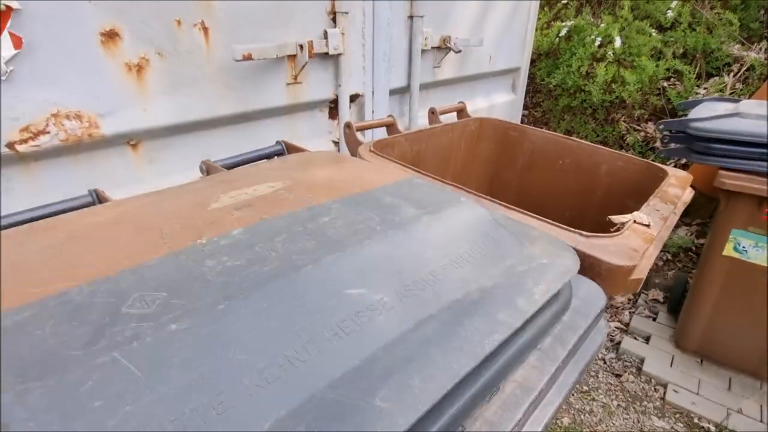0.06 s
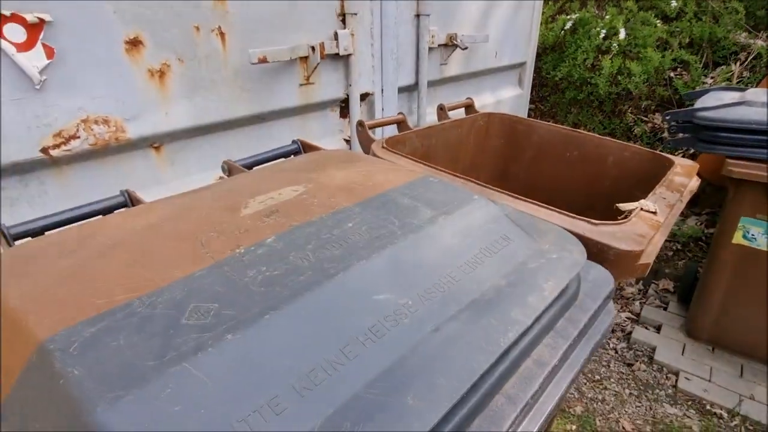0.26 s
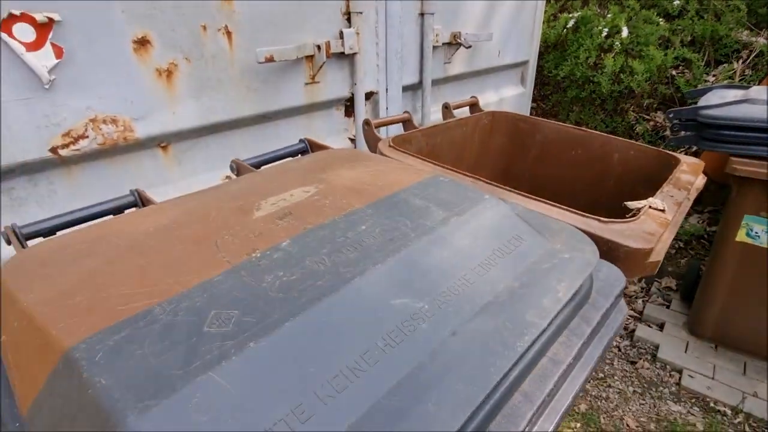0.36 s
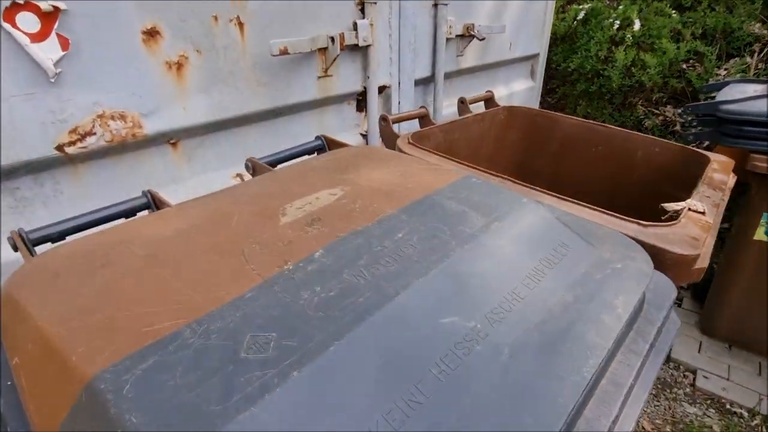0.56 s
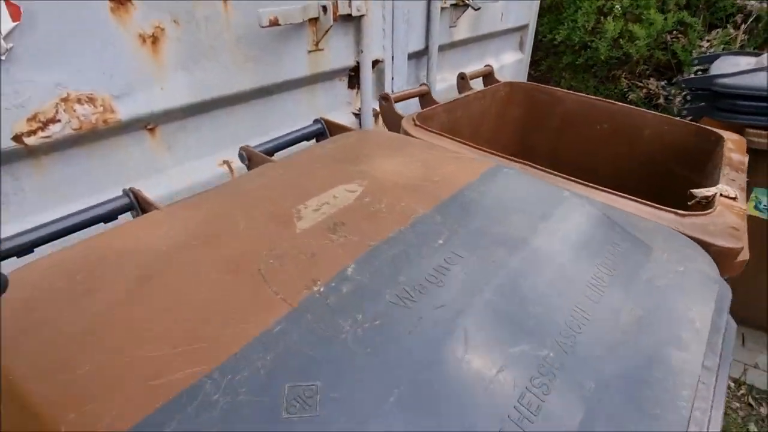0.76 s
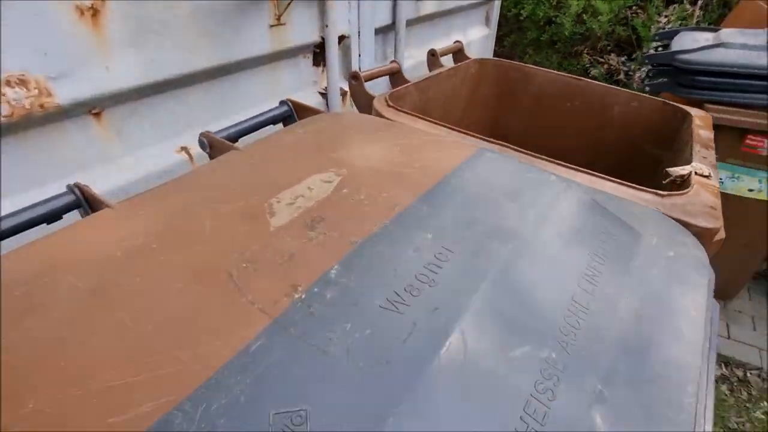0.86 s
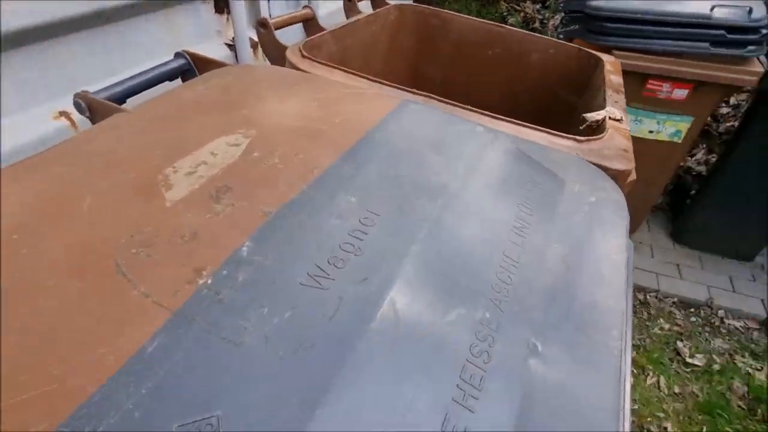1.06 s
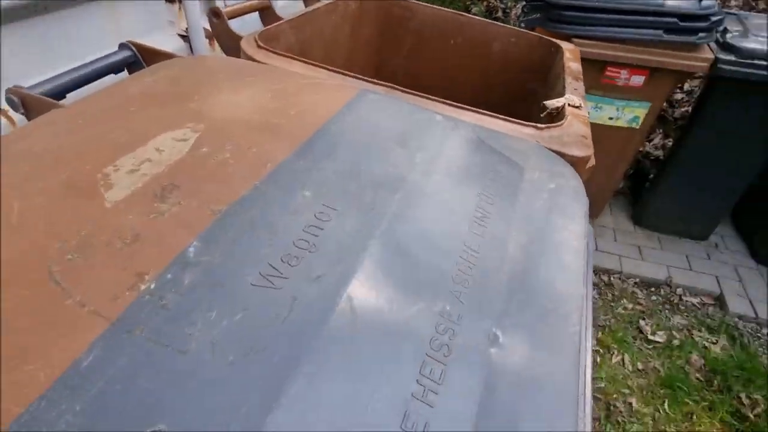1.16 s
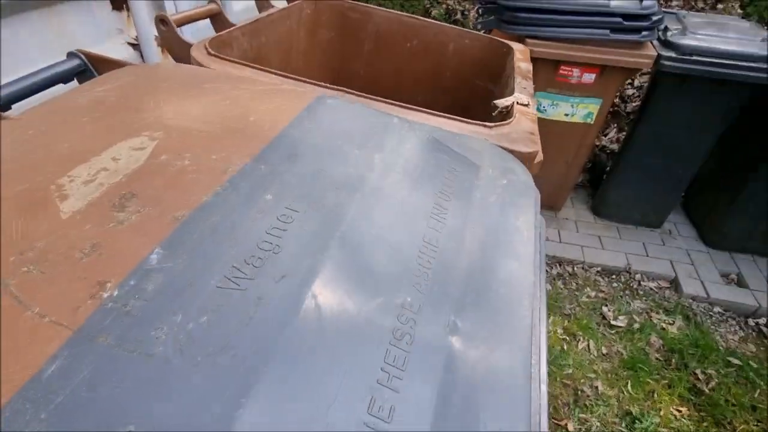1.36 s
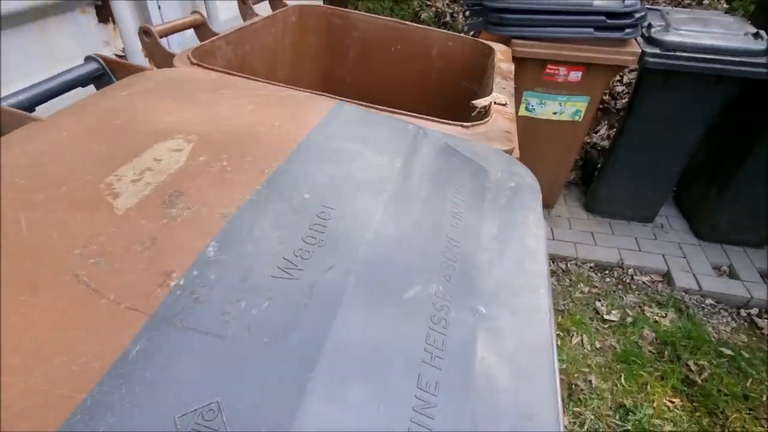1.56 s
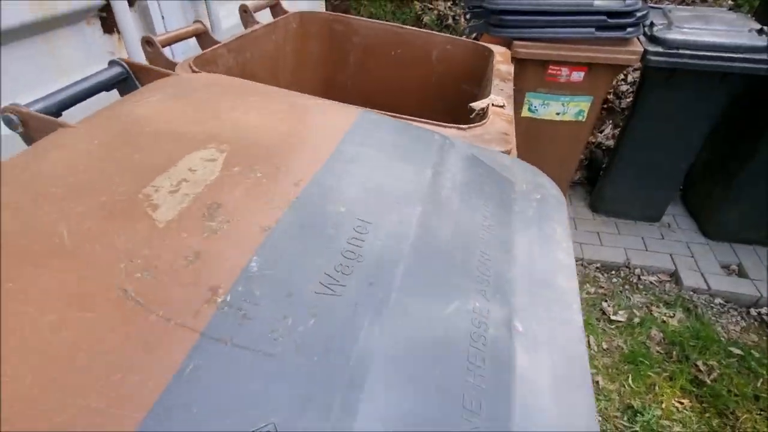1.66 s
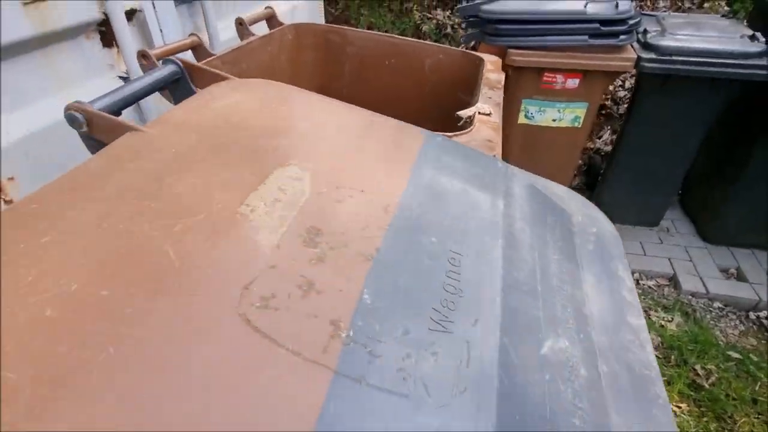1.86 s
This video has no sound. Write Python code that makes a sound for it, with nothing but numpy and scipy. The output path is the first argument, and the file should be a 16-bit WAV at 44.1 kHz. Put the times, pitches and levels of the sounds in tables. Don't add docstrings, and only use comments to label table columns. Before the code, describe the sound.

A large plastic bin lid drops shut close by at about 0.2 s: a sharp crack, a ringing shell and a hollow low boom, with rattling bounces near 0.3 and 0.5 s, fading by 0.7 s with a short yard echo. Quiet outdoor air and low rumble continue. Faint cloth rustles begin near 1 s, with distant bird whistles; soft scuffs and handling knocks follow around 1.5 to 1.7 s.

```python
import sys
import numpy as np
from scipy import signal
from scipy.fft import rfft, irfft, next_fast_len
from scipy.io import wavfile
from scipy.ndimage import uniform_filter1d

SR = 44100
rng = np.random.default_rng(int(sys.argv[2]) if len(sys.argv) > 2 else 0)


def natural_amplitude(level_db):
    exponent = np.asarray(level_db, float) / 20
    return 10 ** exponent


def store_pcm(level_fs):
    pcm = np.round(np.clip(level_fs, -1, 1) * 32767).astype(np.int16)
    wavfile.write(sys.argv[1], SR, np.atleast_2d(pcm).T)


N = 83790


def read(points, hz):
    f, value = np.transpose(points)
    return np.interp(np.log(hz + 1), np.log(f + 1), value)


def evened(x):
    return x / np.sqrt(np.mean(x ** 2) + 1e-30)


def add(mix, start_s, sound):
    part = mix[..., round(start_s * SR):][..., :sound.shape[-1]]
    part += sound[..., :part.shape[-1]]


def sided(left_right_db):
    return natural_amplitude([[left_right_db / 2], [-left_right_db / 2]])


def coloured(x, points, treble_db=0.):
    hz = np.fft.rfftfreq(1024, 1 / SR)
    tilt_db = treble_db * np.log2(np.maximum(hz / 3000, 1)) / 2
    gain = natural_amplitude(read(points, hz) + tilt_db) * (hz > points[0][0] / 2)
    taps = np.roll(irfft(gain), 512) * np.hanning(1024)
    return signal.oaconvolve(x, taps[None] / np.linalg.norm(taps), "same", axes=1)


def drifting_noise(points, db, size):
    # hz, correlation
    likeness = [(30, -0.54), (130, 0.78), (290, 0.6), (640, -0.034), (1400, 0.08), (3100, 0.043),
                (7000, 0.17)]
    patchy_db, swell_db = 1.2, .7
    frames, hz = 4 * N // size + 5, np.fft.rfftfreq(size, 1 / SR)
    a, b, c, d, patches = rng.standard_normal((frames, len(hz), 5)).T
    swell = evened(uniform_filter1d(patches[0], size=24))
    patches = uniform_filter1d(patches, size=12, axis=0)
    patches = evened(uniform_filter1d(patches, size=20, axis=1))
    same = np.clip(read(likeness, hz), -1, 1)[:, None]
    left = a + 1j * b
    right = same * left + np.sqrt(1 - same ** 2) * (c + 1j * d)
    gain_db = read(points, hz)[:, None] + patchy_db * patches + swell_db * swell
    z = np.array([left, right]) * natural_amplitude(gain_db)
    noise = signal.istft(z, nperseg=size, noverlap=size * 3 // 4)[1][:, :N]
    return natural_amplitude(db) * evened(noise)


def hiss():
    # hz, level_db
    hiss_spectrum = [(6000, -1.5), (9000, -6), (11300, -9), (12300, 2), (15700, -1)]
    return drifting_noise(hiss_spectrum, -78.5, size=512)


def rumble():
    # hz, level_db
    rumble_spectrum = [(12, -31), (24, -6.5), (59, 1.5), (177, -25), (311, -25), (344, -16), (400, -26.5),
                       (520, -51), (880, -120)]
    return drifting_noise(rumble_spectrum, -59.5, size=2048) * sided(4.5)


def outdoor_air():
    # hz, level_db
    air_spectrum = [(150, -5), (360, -9.5), (800, -9.5), (2000, -6.5), (4000, -8.5), (4600, -14),
                    (7400, -19), (8300, -33)]
    return drifting_noise(air_spectrum, -61.5, size=512) * sided(-1)


def birds():
    # start_s, length_s, from_hz, to_hz, level_db
    whistles = [
        (1.087, 0.091, 4070, 4050, -69),
        (1.212, 0.106, 3750, 3738, -72),
        (1.269, 0.03, 4900, 4760, -74),
        (1.361, .11, 4180, 4050, -72.5),
        (1.462, .09, 3250, 3490, -65),
        (1.526, 0.128, 3470, 3340, -68),
        (1.754, .13, 3100, 3300, -68),
    ]
    waver_hz, blur_share = 30, .3
    out, chance = np.zeros(N), rng.standard_normal((12, 2, SR // 4))
    for (start_s, length_s, from_hz, to_hz, db), (waver, blur) in zip(whistles, chance):
        u = np.arange(0, 1, 1 / (SR * length_s))
        waver = evened(uniform_filter1d(waver, size=300))[:len(u)]
        hz = from_hz + (to_hz - from_hz) * u + waver_hz * waver
        level = 1 + blur_share * evened(uniform_filter1d(blur, size=400))[:len(u)]
        whistle = np.sin(2 * np.pi * np.cumsum(hz) / SR)
        add(out, start_s, natural_amplitude(db) * np.sin(np.pi * u) * level * whistle)
    return out * sided(-5)


def rustles():
    # start_s, length_s, level_db, treble_db, left_right_db
    strokes = [
        (0.961, 0.064, -58.5, -4.5, 0.5),
        (1.1, 0.1, -72.5, 16, 6),
        (1.059, 0.026, -64.5, 4.5, 7),
        (1.083, 0.03, -61.5, -12, -4.5),
        (1.101, 0.057, -64, 0, 1),
        (1.15, 0.04, -63.5, 2, 6),
        (1.79, 0.11, -67, 7, -3),
        (1.605, 0.1, -68, 5, 0),
    ]
    # hz, level_db
    cloth_spectrum = [(800, -44), (1900, -7), (4700, -5), (7300, -8.5), (8300, -19), (11300, -17),
                      (12300, -12), (15700, -14)]
    grains_per_s, spread_db = 8000, 2.2
    out = np.zeros((2, N))
    grains = rng.standard_normal((2, N)) * natural_amplitude(spread_db * rng.exponential(1, N))
    grains = grains * (rng.random(N) < grains_per_s / SR)
    grains = evened(grains + .5 * rng.standard_normal((2, N)))
    for start_s, length_s, db, treble_db, pan_db in strokes:
        part = grains[:, round(start_s * SR):][:, :round(length_s * SR)]
        u = np.arange(part.shape[1]) / (length_s * SR)
        stroke = np.sin(np.pi * u ** .7) ** 1.1
        add(out, start_s, natural_amplitude(db) * sided(pan_db) * stroke * coloured(part, cloth_spectrum, treble_db))
    return out


def scuffs():
    # start_s, length_s, level_db
    rubs = [
        (0.0, 0.081, -61.5),
        (1.488, 0.11, -62.5),
        (1.581, 0.13, -60.5),
    ]
    # hz, level_db
    scuff_spectrum = [(120, -9), (400, 0), (700, -9.5), (1300, -6), (2000, -35.5)]
    out, noise = np.zeros(N), coloured(rng.standard_normal((1, N)), scuff_spectrum)[0]
    for start_s, length_s, db in rubs:
        part = noise[round(start_s * SR):][:round(length_s * SR)]
        add(out, start_s, natural_amplitude(db) * part * np.sin(np.pi * np.linspace(0, 1, len(part)) ** .7))
    return out


def rings(rows):
    peak_share, roundness = 0.21, 0.51
    out = np.zeros(N)
    for start_s, hz, db, length_s in rows:
        t = np.arange(0, 2 * length_s, 1 / SR)
        u = t / (peak_share * length_s)
        swell = (u * np.exp(1 - u)) ** roundness
        fade = np.cos(np.pi * t / 4 / length_s)
        add(out, start_s, natural_amplitude(db) * swell * fade * np.sin(2 * np.pi * hz * t))
    return out


def knocks():
    # start_s, pitch_hz, peak_db, length_s
    knock_rows = [(.001, 50.4, -52, 0.052), (.055, 55, -50, 0.08), (.09, 144, -67, 0.054),
                  (.2875, 1710, -43, 0.0056), (1.545, 63.7, -51, .05), (1.597, 512, -49, .012),
                  (1.645, 294, -49.5, 0.014), (.319, 3196, -55, 0.014), (1.035, 89.5, -49.5, 0.012),
                  (1.2, 470, -61.5, 0.0045), (1.4, 64, -79, 0.13), (1.565, 190.4, -56.5, 0.05),
                  (1.590, 413, -42, 0.012), (1.605, 59.6, -50, 0.098), (1.6085, 184, -42.5, 0.013),
                  (1.6105, 1086, -50.5, 0.0067), (1.621, 320, -45, 0.0091), (1.626, 465, -56, 0.011),
                  (1.64, 124, -47, 0.073), (1.6625, 198, -44, 0.009), (1.626, 169, -48, 0.014),
                  (1.703, 110, -52, 0.0068), (1.663, 367, -58, 0.032), (1.672, 220, -50, 0.024),
                  (1.692, 92, -49, 0.037), (1.7, 314, -59.5, 0.026), (1.778, 62.3, -54, 0.14)]
    return rings(knock_rows)


def booms():
    # start_s, pitch_hz, peak_db, length_s
    boom_rows = [(.2165, 205, -35.5, 0.094), (.228, 57.7, -39, 0.095), (.2445, 101, -37, 0.028),
                 (.2883, 97.3, -25.5, 0.038), (.2135, 142, -38.5, 0.023), (.214, 371, -41, 0.029),
                 (.221, 786, -42.5, .018), (.2945, 1053, -42, .014), (.35, 370, -46, .02),
                 (.494, 401, -50.5, .03), (.298, 266, -43, 0.048), (.306, 184, -35, 0.033),
                 (.378, 68.7, -33.5, 0.026), (.325, 121, -47.5, 0.15), (.3275, 65.56, -35.5, 0.13),
                 (.345, 192.3, -39, 0.0566), (.398, 93.4, -53, 0.42), (.4875, 90.74, -37.5, 0.11),
                 (.4985, 186, -44.5, 0.045), (.559, 86.8, -36.5, 0.083), (.5655, 42.7, -34.5, 0.039),
                 (.572, 142, -40.5, 0.03), (.562, 190, -46.5, 0.033), (.557, 299, -54, 0.027),
                 (.6335, 93.8, -40, 0.036), (.668, 90.3, -42.5, 0.038), (.735, 62.6, -56.5, 0.027),
                 (.775, 58, -54, 0.017)]
    return rings(boom_rows)


def yard(x):
    # hz, t60_s
    decay = [(500, 0.18), (1700, 0.18), (4000, 0.14), (10000, 0.19)]
    hz, t, z = signal.stft(rng.standard_normal((2, SR // 2)), SR, nperseg=128)
    z = z * natural_amplitude(-60 * t / read(decay, hz)[:, None]) * (hz > 300)[:, None]
    tail = signal.istft(z, SR, nperseg=128)[1]
    return natural_amplitude(-3.5) * signal.fftconvolve(x, tail / np.linalg.norm(tail[0]), axes=1)[:, :N]


def cracks():
    # start_s, level_db, length_ms, treble_db
    slaps = [
        (.107, -76, 1.5, 11),
        (0.2065, -62, 7.7, -11),
        (0.2134, -35.5, 8, 7.5),
        (0.2256, -70, 4.8, 2),
        (.289, -58, 9, -4),
        (.3825, -60, 2.4, 29),
        (1.611, -58.5, 5.1, 22),
        (.2168, -37, 4.4, -7),
    ]
    # hz, level_db
    crack_spectrum = [(400, -46), (1100, -12.5), (2200, 5), (3200, -7), (4800, -12.5), (6200, -13.5),
                      (7800, -30.5), (15700, -39.5)]
    out, noise = np.zeros((2, N)), rng.standard_normal((20, 2, 2048))
    t = (np.arange(2048) - 600) / SR
    for (start_s, db, length_ms, treble_db), n in zip(slaps, noise):
        rise = np.clip(t / 0.00031, 0, 1)
        fall = natural_amplitude(-20 * np.clip(1000 * t / length_ms, 0, 3) ** 0.9)
        burst = rise * fall * (0.98 * n[:1] + n) * sided(-7.5)
        add(out, start_s + t[0], natural_amplitude(db) * coloured(burst, crack_spectrum, treble_db))
    return out


def shell():
    # start_s, force_db, contact_ms
    contacts = [(0.2134, -3, 0.39), (0.2172, -3.5, 0.56), (0.2217, -8.5, 0.55), (0.2259, -5, 0.41),
                (.232, -1, 0.74), (0.248, -15.5, 0.5), (0.264, -11, 1.4), (0.276, -6.5, 0.95),
                (0.2882, -8, 0.37), (0.2946, -4.5, 0.67), (.308, -6, 0.48), (.327, -9.5, 0.64),
                (0.345, -24, 1), (.360, -12.5, 1.2), (0.383, -12, 4.1), (0.4898, -15, 0.62),
                (0.5, -12.5, 1.1), (.512, -13, 2.1), (0.528, -19.5, 1.23), (0.5562, -17, 0.59),
                (0.56, -16, 0.88), (0.569, -20, 0.9), (.59, -24, 3.3), (.301, -10.5, 0.38), (.318, -9, .6),
                (0.337, -22, 0.4), (.352, -12.5, 0.73), (.369, -18, 0.65), (.239, -9.5, 0.46)]
    # pitch_hz, level_db
    modes = [(190, -4.5), (272, -15), (360, -8.5), (415, -10), (500, -12), (590, -21), (700, -10.5),
             (835, -6.5), (980, -4), (1130, 1), (1270, -8.5), (1850, -2), (2350, -7), (2750, -0.5)]
    spot_db = 2.5
    spread, neighbour_db, stiff_hz = .1, 4, 230
    far_port = .5
    ring_s, ring_slope = .37, 1.25
    out, t = np.zeros((2, N)), np.arange(SR // 3) / SR
    hz, db = np.transpose(modes)[:, :, None]
    t60_s = ring_s * (hz[0] / hz) ** ring_slope
    dying = natural_amplitude(db - 60 * t / t60_s)
    spots = rng.standard_normal((30, 5, len(modes)))
    sides = [[1], [far_port]], [[far_port], [1]]
    for (start_s, force_db, contact_ms), (spot, *near) in zip(contacts, spots):
        ring = natural_amplitude(spot_db * spot) @ (dying * np.sin(2 * np.pi * hz * t))
        for (off, weight), side in zip((near[:2], near[2:]), sides):
            beside_hz = hz * (1 + spread * off[:, None])
            beside = np.sin(2 * np.pi * beside_hz * t) * (hz > stiff_hz)
            ring = ring + natural_amplitude(neighbour_db) * np.array(side) * (weight @ (dying * beside))
        push = np.sin(np.pi * np.arange(0, 1, 1000 / (SR * max(contact_ms, .05)))) + 1e-3
        add(out, start_s, natural_amplitude(force_db) * signal.oaconvolve(ring, push[None] / push.sum(), axes=1))
    return natural_amplitude(-37.5) * out


def ports(x):
    # hz, left_right_db
    side_db = [(60, .9), (200, .6), (700, 5), (1300, 2), (4400, -3.5), (15000, -.5)]
    # hz, left_lead_rad
    lead_rad = [(30, .6), (80, .45), (200, .25), (400, 1.1), (800, 1.7), (1550, 1.9), (3400, 1.5),
                (5800, -1.5)]
    size = next_fast_len(N + 4096)
    hz = np.fft.rfftfreq(size, 1 / SR)
    half = natural_amplitude(read(side_db, hz) / 2) * np.exp(.5j * read(lead_rad, hz))
    return irfft(rfft(x, size) * np.array([half, 1 / half]), size)[:, :N]


def scene():
    floor = outdoor_air() + rumble() + hiss()
    low = ports(booms() + knocks() + scuffs())
    hard = ports(shell()) + cracks()
    return floor + birds() + rustles() + low + hard + yard(hard)


def top_cut(x):
    return signal.sosfilt(signal.butter(12, 15800, fs=SR, output="sos"), x)


def record(dry):
    cut = signal.sosfilt(signal.butter(2, 24, "high", fs=SR, output="sos"), dry)
    return top_cut(cut)


dry = scene()
out = record(dry)
store_pcm(out)
```